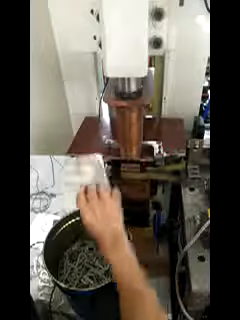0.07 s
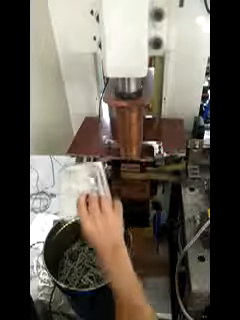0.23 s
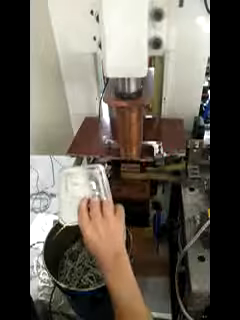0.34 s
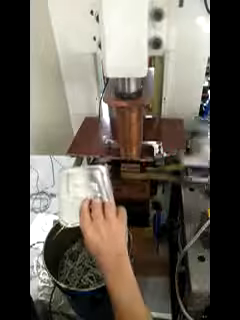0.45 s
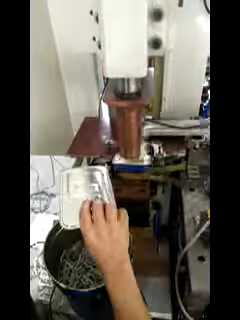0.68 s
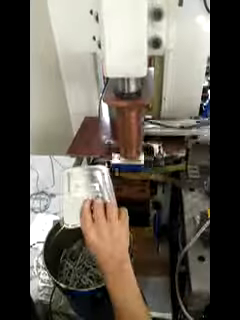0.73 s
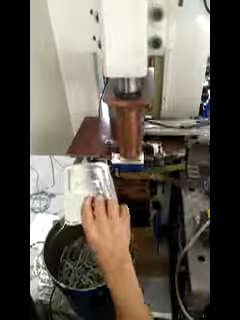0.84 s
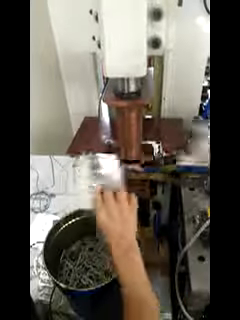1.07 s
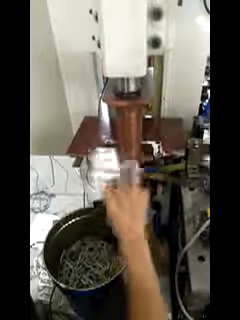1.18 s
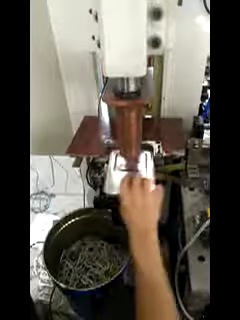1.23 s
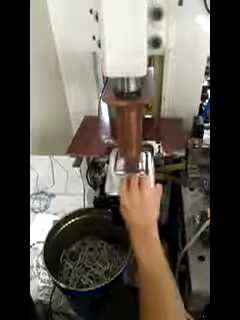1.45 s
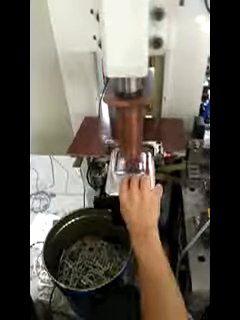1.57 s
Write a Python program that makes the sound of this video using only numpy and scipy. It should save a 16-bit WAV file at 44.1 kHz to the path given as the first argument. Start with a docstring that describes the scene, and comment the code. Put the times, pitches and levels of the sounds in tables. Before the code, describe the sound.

Close by in a humming workshop, an air-driven welding press puffs from its valves and clanks several times against its stops. It then lets out a hiss that sinks away among a few faint metal taps.

```python
"""Pneumatic welding press in a workshop.

The press cycles close by. Valves let out spurts of air, the slides hit their stops
and set the steel frame ringing, and a long exhaust hiss dies away into the drone of
the other machines. Air and contacts are shaped noise; steel modes are decaying sines."""
import sys
import numpy as np
from scipy import signal
from scipy.fft import rfft, irfft
from scipy.io import wavfile

SR = 44100
rng = np.random.default_rng(int(sys.argv[2]) if len(sys.argv) > 2 else 0)


def store_wav(level_fs):
    """Save 16-bit WAV to argv[1]."""
    pcm = np.round(np.clip(np.atleast_2d(level_fs), -1, 1) * 32767)
    wavfile.write(sys.argv[1], SR, pcm.T.astype(np.int16))


N = 70560
T, HZ = np.arange(N) / SR, np.fft.rfftfreq(N, 1 / SR)
EDGE_HZ, BASS_CUT_HZ, CEILING = 10000, 145, 0.92

# Left-right likeness: freq_hz, correlation
STEREO_CORRELATION = [(50, 1), (170, 0.9), (330, 0.88), (650, 0.51), (1200, 0.058), (2400, 0.08),
                      (6000, 0.071)]
# Drone spectrum: freq_hz, density_db
DRONE_SPECTRUM = [(15, -62), (25, -40.5), (45, -12), (65, -10), (113, -8), (168, -4), (211, -11),
                  (251, -10.5), (425, -11.5), (651, -10.5), (756, -10), (857, -8), (1050, -14.5),
                  (1860, -11), (3160, -19.5), (4260, -17.5), (8180, -36.5), (10000, -64), (13000, -72),
                  (22000, -120)]
# Drone level: time_s, level_db
DRONE_LEVEL = [(0, -38.5), (.3, -38.5), (.68, -38.5), (.95, -35), (1.25, -36.5), (1.6, -37.5)]
# Drone balance (side = left minus right): freq_hz, side_db
DRONE_SIDE = [(100, 0.5), (900, -0.5), (2400, 4.5), (4000, 3), (8000, 1)]
# Motor tones: pitch_hz, level_db
MOTOR_TONES = [(77, -51.5), (155.6, -47), (168.2, -48), (249, -53.5), (259, -55.5), (400, -50.5),
               (548, -59), (633, -56.5), (803, -54), (868, -52.5)]
# Workshop reverberation: freq_hz, t60_s
ROOM_DECAY = [(100, 0.18), (400, 0.53), (2000, 0.56), (8000, 0.27)]
ROOM_DB, MOTOR_WANDER = -16.5, 0.0044  # wander: share of pitch

# Slides on their guides: start_s, hold_s, level_db, pitch_hz
SLIDE_TRAVELS = [(0.192, 0.055, -40.5, 406), (0.579, 0.04, -34.5, 413), (0.709, 0.096, -41, 447),
                 (0.945, 0.059, -44.5, 336)]
TRAVEL_WIDTH_OCT, TRAVEL_RISE_S, TRAVEL_T60_S = 0.17, 0.016, 0.31
# Feeder and workpiece knocks: start_s, level_db, pitch_hz, t60_s, side_db
FEEDER_KNOCKS = [(0.203, -31, 875, 0.25, -2), (0.485, -29, 1700, 0.44, 18), (0.802, -32.5, 2060, 0.62, 10),
                 (1.039, -31.5, 1610, 0.35, 7), (1.079, -31, 1680, 0.28, 15), (1.413, -34, 2200, 0.11, -9),
                 (1.517, -32.5, 490, 0.1, -1), (1.569, -35, 1540, 0.3, 3)]
KNOCK_WIDTH_OCT, KNOCK_RISE_S, CONTACT_SKIRT_DB = 0.25, 0.002, -15

# Cylinder emptying: time_s, level_db
EXHAUST_CONTOUR = [(.78, -84), (.82, -27), (.88, -40), (.93, -33), (1.01, -35.5), (1.15, -41), (1.3, -41),
                   (1.4, -35.5), (1.6, -41.5)]
# Exhaust hiss: freq_hz, density_db
EXHAUST_SPECTRUM = [(400, -17), (1200, -14), (1650, -1), (2200, 3.5), (3000, 1.5), (4000, 6), (4800, -2.5),
                    (6300, -1.5), (7500, -11), (8800, -12), (10000, -31.5)]
# Valve spurts: start_s, rise_s, hold_s, t60_s, level_db, tilt_db_per_oct, low_cut_hz
VALVE_SPURTS = [(0.1786, 0.0021, 0.011, 0.22, -26.5, 1, 300), (0.1795, .002, .012, .15, -39, 20, 8500),
                (0.202, .003, 0.0064, 0.28, -28, 0.5, 300), (0.23, 0.0042, 0.0079, 0.22, -22.5, -2, 700),
                (0.392, 0.011, 0.036, 0.15, -27, -7, 400), (0.477, 0.013, 0.017, 0.33, -25, -4.5, 300),
                (0.517, 0.0049, 0.0093, 0.26, -30.5, -8.5, 4500),
                (0.714, 0.0037, 0.039, 0.15, -27.5, -1.5, 300),
                (0.777, 0.0086, 0.032, 0.15, -24.5, 1.5, 1500), (0.814, .006, 0.013, 0.96, -29, 9.5, 1500),
                (0.905, .005, 0.02, 0.24, -31, 6.5, 4800), (1.411, 0.0037, 0.029, 0.088, -38, 12, 300)]
# Valve jet: freq_hz, density_db
JET_SPECTRUM = [(60, -64), (300, -11), (1100, -10.5), (2000, -5.5), (2900, -2), (3700, 1), (4700, -7),
                (5400, -1.5), (6600, -3), (8000, -14), (9800, -30.5)]
# Added balance of all escaping air: freq_hz, side_db
AIR_BALANCE = [(1000, -5), (2400, -2.5), (3700, 3.5), (5500, -0.5), (9000, -1.5)]
EXHAUST_SIDE_DB, SPURT_SIDE_DB = 2.5, 4.5
SPUTTER_DB, SPUTTER_HZ = 2.5, 107
ECHO_MIN_S, ECHO_MAX_S, ECHO_DB = 0.000679, 0.009, -18.5

# Stops and small parts ringing: start_s, pitch_hz, level_db, t60_s, side_db
STEEL_PINGS = [(0.252, 1110, -16.5, 0.03, -6), (0.2507, 1316, -18.5, 0.022, -10),
               (.258, 1579, -12, 0.077, 7.5), (0.264, 1788, -28.5, 0.16, 6), (.255, 2800, -25, 0.047, 14),
               (.418, 1072, -14, 0.077, -4.5), (.42, 1180, -15.5, 0.14, -2.5),
               (.432, 748, -31, 0.035, -19.5), (0.714, 1060, -27.5, 0.094, -5),
               (.712, 1149, -21.5, 0.04, -8), (0.712, 1272, -39.5, 0.29, 2.5),
               (0.714, 1430, -18.5, 0.11, -3), (0.72, 6380, -31, 0.086, 15), (0.747, 3570, -25, 0.082, 0),
               (.786, 7030, -25, .07, 2), (.794, 2336, -25.5, 0.077, 13), (0.789, 2908, -22.5, 0.078, 8),
               (0.796, 5100, -25.5, .08, 8), (1.41, 3980, -34.5, 0.077, 16)]
PING_RISE_S, PING_HOLD_S, PING_WAVER_RAD = 0.0023, 0.0069, 0.25
# Steel frame and covers: pitch_hz, level_db, t60_s
FRAME_MODES = [(137, -7, 0.58), (261.8, -11.5, 0.57), (292.8, -10.5, 0.83), (334.5, -5, 0.74),
               (371, -8.5, 0.47), (601.5, -5, 0.21), (768, 9.5, 0.13), (786, 1, 0.14), (1577, -14, 0.54),
               (1628, -6.5, 0.77), (1850, -13, 0.41)]
FRAME_LAG_S, FRAME_RISE_S, FRAME_WAVER_RAD, PANEL_DB = 0.0018, 0.01, 0.5, 4
# Dense panel modes: freq_hz, density_db
PANEL_SPECTRUM = [(30, -39), (80, -36), (135, -25), (200, -9.5), (320, 4), (520, -15), (780, 1),
                  (1000, -16.5), (1250, -7), (1750, -11), (3000, -18), (5000, -50), (10000, -66)]
# Panel damping: freq_hz, t60_s
PANEL_DECAY = [(100, 0.31), (330, 0.61), (800, 0.25), (1800, 0.56), (6000, 0.063)]
THUMP_HZ, THUMP_RISE_S, THUMP_HOLD_S, THUMP_T60_S = 135, 0.041, 0.052, 0.11
# Slides hitting their stops:
# start_s, level_db, pitch_hz, width_oct, rise_s, chatter_s, t60_s, frame_db, thump_db, side_db
SLIDE_BLOWS = [(0.252, -15.5, 1530, 0.55, 0.0028, 0.008, 0.083, -22, -26, -1),
               (0.417, -19.5, 1380, 0.6, 0.015, 0.015, 0.092, -24, -47, 12),
               (0.712, -22, 1324, 0.28, .0015, 0.0054, 0.17, -40.5, -33.5, -3),
               (0.787, -17.5, 2440, 0.46, 0.008, 0.0094, 0.031, -66, -62, 5)]


def amp(db):
    """Decibels to gain."""
    return 10 ** (np.asarray(db) / 20)


def unit(x):
    """Scale to rms 1."""
    return x / np.sqrt(np.mean(x ** 2) + 1e-20)


def read(points, hz=HZ):
    """Interpolate a table over log frequency."""
    freq_hz, value = np.transpose(points)
    return np.interp(np.log(hz + 1), np.log(freq_hz + 1), value)


def noise(shape_db, side_db=0):
    """Shaped stereo noise, rms 1, near mono in the bass."""
    left, spare = rng.standard_normal((2, len(HZ))) + 1j * rng.standard_normal((2, len(HZ)))
    correlation = read(STEREO_CORRELATION)
    right = correlation * left + np.sqrt(1 - correlation ** 2) * spare
    pair = np.array([left * amp(side_db / 2), right * amp(-side_db / 2)])
    return unit(irfft(pair * amp(shape_db), N))


def stereo_phase(hz):
    """Left and right phase offsets of a mode, in radians."""
    apart_rad = rng.choice([-1, 1]) * np.arccos(read(STEREO_CORRELATION, hz))
    return np.array([[0.5], [-0.5]]) * apart_rad


def drift(rate_hz):
    """Low-passed random motion, rms 1."""
    return unit(irfft(rfft(rng.standard_normal(N)) * np.exp(-(HZ / rate_hz) ** 2), N))


def envelope(start_s, rise_s, hold_s, t60_s):
    """Linear attack; exponential release from hold_s after the start."""
    age_s = T - start_s
    return np.clip(age_s / rise_s, 0, 1) * np.exp(-np.log(1000) * np.maximum(age_s - hold_s, 0) / t60_s)


def die_away(x, start_s, decay):
    """Decay each band at its own rate from start_s."""
    hz, time_s, bands = signal.stft(x, SR, nperseg=512)
    fade = np.exp(-np.log(1000) * np.maximum(time_s - start_s, 0) / read(decay, hz)[:, None])
    return signal.istft(bands * fade, SR, nperseg=512)[1][:, :N]


def contact(hz, width_oct, side_db):
    """Mode cluster: a noise band with weak skirts."""
    away_oct = np.log2((HZ + 1) / hz)
    shape = np.exp(-0.5 * (away_oct / width_oct) ** 2) + amp(CONTACT_SKIRT_DB) / (1 + away_oct ** 4)
    return noise(20 * np.log10(shape), side_db)


def workshop():
    """Distant machines: wide drone and wavering, beating motor tones."""
    out = noise(read(DRONE_SPECTRUM), read(DRONE_SIDE))
    out *= amp(np.interp(T, *np.transpose(DRONE_LEVEL)) + 0.49 * drift(rate_hz=77))
    for hz, db in MOTOR_TONES:
        pitch_hz = hz * (1 + MOTOR_WANDER * drift(rate_hz=11.2))
        out += np.sqrt(2) * amp(db) * np.sin(2 * np.pi * (np.cumsum(pitch_hz) / SR + rng.random()))
    return out


def room(x):
    """Diffuse tail of the workshop."""
    tail = die_away(noise(0 * HZ), 0, ROOM_DECAY) * np.clip(T / 0.023, 0, 1)
    return signal.fftconvolve(x, tail / np.linalg.norm(tail[0]), axes=1)[:, :N]


def travels():
    """Slides rumble softly along their guides."""
    return sum(amp(db) * contact(hz, TRAVEL_WIDTH_OCT, side_db=0)
               * envelope(start_s, TRAVEL_RISE_S, hold_s, TRAVEL_T60_S)
               for start_s, hold_s, db, hz in SLIDE_TRAVELS)


def knocks():
    """Light metal contacts that do not shake the frame."""
    return sum(amp(db) * contact(hz, KNOCK_WIDTH_OCT, side_db)
               * envelope(start_s, KNOCK_RISE_S, 0, t60_s)
               for start_s, db, hz, t60_s, side_db in FEEDER_KNOCKS)


def exhaust():
    """The cylinder empties; its hiss sinks unevenly to a faint leak."""
    level_db = np.interp(T, *np.transpose(EXHAUST_CONTOUR)) + drift(rate_hz=35)
    return amp(level_db) * noise(read(EXHAUST_SPECTRUM), EXHAUST_SIDE_DB + read(AIR_BALANCE))


def spurts():
    """Each valve releases a short jet."""
    octaves = np.log2(np.maximum(HZ, 700) / 4000)
    jets = np.zeros((2, N))
    for start_s, rise_s, hold_s, t60_s, db, tilt_db_per_oct, cut_hz in VALVE_SPURTS:
        cut_db = 10 * np.log10(1 + (cut_hz / (HZ + 1)) ** 8)
        shape_db = read(JET_SPECTRUM) + tilt_db_per_oct * octaves - cut_db
        jet = noise(shape_db, SPURT_SIDE_DB + read(AIR_BALANCE))
        jets += amp(db) * jet * envelope(start_s, rise_s, hold_s, t60_s)
    return jets * amp(drift(rate_hz=40))


def sputter(air, count=6):
    """Turbulence makes each band of the air flicker on its own."""
    position = np.clip(HZ / EDGE_HZ, 0, 1) * (count - 1)
    bands = (irfft(rfft(air) * np.maximum(1 - abs(position - k), 0), N) for k in range(count))
    return sum(band * unit(amp(SPUTTER_DB * drift(SPUTTER_HZ))) for band in bands)


def near_echoes(air, count=6):
    """Hard faces of the press comb the hiss, differently on each side."""
    delays_s = rng.uniform(ECHO_MIN_S, ECHO_MAX_S, (2, count, 1))
    comb = 1 + amp(ECHO_DB) * np.exp(-2j * np.pi * HZ * delays_s).sum(1)
    return irfft(rfft(air) * comb / np.sqrt(np.mean(abs(comb) ** 2)), N)


def pings():
    """Stops and small parts ring as the slides and workpiece seat."""
    out = np.zeros((2, N))
    for start_s, hz, db, t60_s, side_db in STEEL_PINGS:
        phase = stereo_phase(hz) + 2 * np.pi * (hz * T + rng.random())
        ring = np.sin(phase + PING_WAVER_RAD * drift(rate_hz=180))
        gains = amp([[db + side_db / 2], [db - side_db / 2]])
        out += gains * ring * envelope(start_s, PING_RISE_S, PING_HOLD_S, t60_s)
    return out


def thump(start_s):
    """The press sways on its base after a blow."""
    sway = np.sin(2 * np.pi * (THUMP_HZ * T + rng.random()))
    return sway * envelope(start_s, THUMP_RISE_S, THUMP_HOLD_S, THUMP_T60_S)


def frame(start_s):
    """Frame and panels ring after a blow; loose covers make the frame modes waver."""
    onset_s = start_s + FRAME_LAG_S
    modes = np.zeros((2, N))
    for hz, db, t60_s in FRAME_MODES:
        phase = 2 * np.pi * (hz * T + rng.random()) + stereo_phase(hz)
        ring = np.sin(phase + FRAME_WAVER_RAD * drift(rate_hz=55))
        modes += amp(db) * ring * envelope(onset_s, FRAME_RISE_S, 0, t60_s)
    panels = die_away(noise(read(PANEL_SPECTRUM)), start_s, PANEL_DECAY)
    return modes + amp(PANEL_DB) * panels * np.clip((T - onset_s) / FRAME_RISE_S, 0, 1)


def blows():
    """A slide chatters against its stop; the frame takes up the shock."""
    out = np.zeros((2, N))
    for start_s, db, hz, width_oct, rise_s, chatter_s, t60_s, frame_db, thump_db, side_db in SLIDE_BLOWS:
        out += amp(db) * contact(hz, width_oct, side_db) * envelope(start_s, rise_s, chatter_s, t60_s)
        out += amp(frame_db) * frame(start_s) + amp(thump_db) * thump(start_s)
    return out


def scene():
    """The press, its reverberation and the workshop."""
    metal = blows() + pings() + knocks() + travels()
    air = near_echoes(sputter(spurts() + exhaust()))
    radiation = 1 / np.sqrt(1 + (BASS_CUT_HZ / (HZ + 1)) ** 8)  # the press radiates little bass
    press = irfft(rfft(metal + air) * radiation, N)
    return press + amp(ROOM_DB) * room(press) + workshop()


def record(dry):
    """Soft clip, then low-pass."""
    rounded = CEILING * np.tanh(dry / CEILING)
    low_pass = signal.firwin(401, EDGE_HZ, window=("kaiser", 9), fs=SR)
    return signal.oaconvolve(rounded, low_pass[None], "same")


dry = scene()
out = record(dry)
store_wav(out)
```